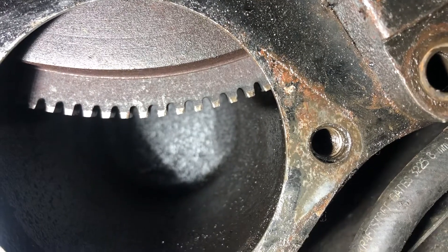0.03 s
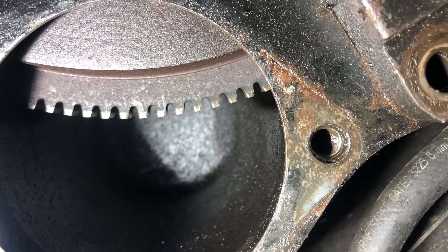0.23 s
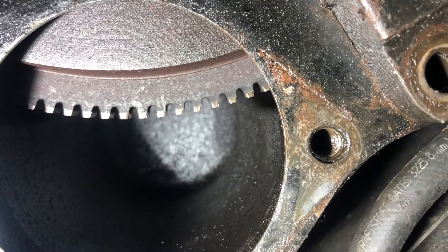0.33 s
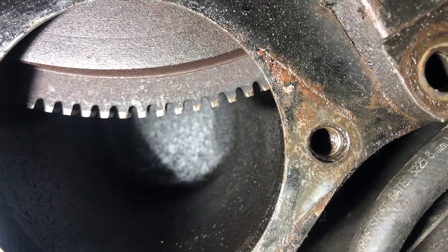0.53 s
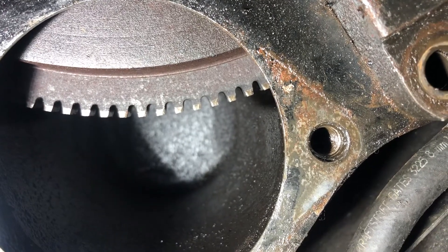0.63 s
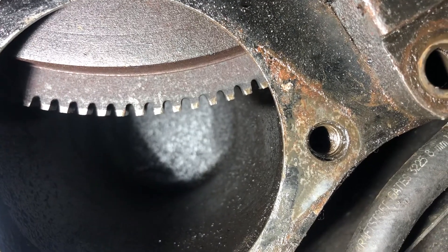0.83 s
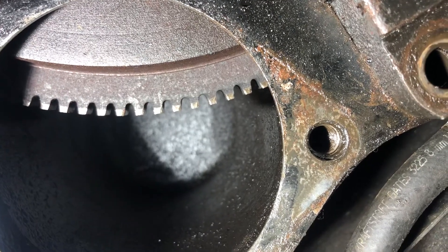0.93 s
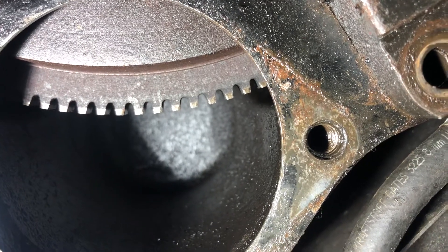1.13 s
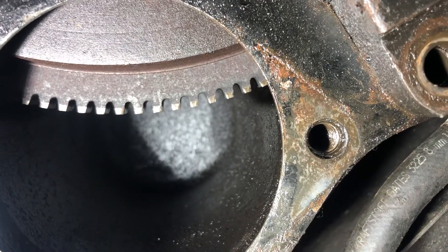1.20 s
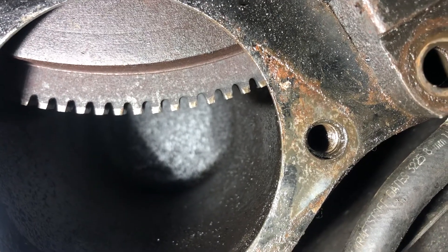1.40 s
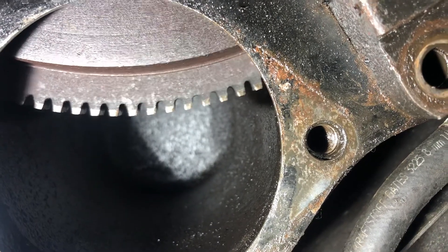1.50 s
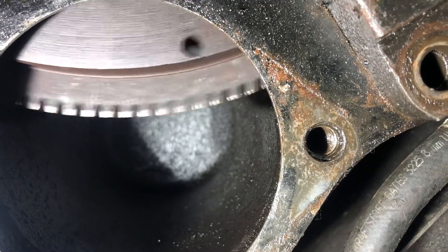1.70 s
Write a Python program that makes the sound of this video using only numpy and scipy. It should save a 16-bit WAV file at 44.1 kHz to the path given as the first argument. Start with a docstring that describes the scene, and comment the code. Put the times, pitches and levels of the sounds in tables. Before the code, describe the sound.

Six sharp ratchet clicks from a steel wheel speed up, followed by a faint hiss.

```python
"""In a small room, close by, a toothed steel wheel is turned by hand in its worn housing.
A catch scrapes up each tooth and snaps off it six times, ever faster; each impact excites the damped
modes of housing and wheel. The slack knocks softly before and after. Near the end the wheel starts
to rub, and the friction makes a swelling hiss. A low hum runs underneath."""
import sys
import numpy as np
from scipy import signal
from scipy.fft import rfft, irfft, next_fast_len
from scipy.io import wavfile
from scipy.ndimage import map_coordinates

SR = 44100
rng = np.random.default_rng(int(sys.argv[2]) if len(sys.argv) > 2 else 0)


def bounce(signal):
    """Save signal as a 16-bit WAV file at the path given by the first command-line argument."""
    frames = np.transpose(np.atleast_2d(signal))
    limited = np.clip(frames, -1, 1)
    pcm = np.round(limited * 32767).astype(np.int16)
    wavfile.write(sys.argv[1], SR, pcm)


N = 77175

# normal modes of the steel wheel: f/Hz, level/dB, t60/s
WHEEL_MODES = [(3810, -22.5, 0.036), (4304, -17, 0.073), (4480, -25, .115), (5960, -20, 0.074),
               (6900, -20.5, 0.074), (7160, -19.5, .05), (7975, -7.5, 0.061), (8040, -9.5, 0.043),
               (9250, -10, 0.063), (9337, -11, 0.067), (9620, -11, .07), (11900, -17, 0.038),
               (12320, -4, 0.053), (12700, -8, 0.057), (14450, -25.5, 0.052)]


def amp(db):
    """Amplitude ratio of a level in decibels."""
    return 10 ** (np.asarray(db) / 20)


def along(points, hz):
    """Interpolation of (f/Hz, value) points on a logarithmic frequency axis."""
    f, values = np.transpose(points)
    return np.interp(np.log(hz + 1), np.log(f + 1), values)


def since(onset):
    """Time in seconds since the onset, zero before it."""
    return np.maximum(np.arange(N) / SR - onset, 0)


def curve(points):
    """Linear interpolation of (t/s, value) points at every sample."""
    return np.interp(since(0), *np.transpose(points))


def wobble(rate):
    """Random modulation: a spline through Gaussian values, rate of them a second."""
    return map_coordinates(rng.standard_normal(4 * SR // 10), [since(0) * rate], mode="wrap")


def filtered(x, response):
    """Linear filtering: the spectrum of x times a frequency response."""
    size = next_fast_len(N + SR // 4)
    return irfft(rfft(x, size) * response(np.fft.rfftfreq(size, 1 / SR)), size)[:N]


def noise(spectrum, peaks=()):
    """Spectral shaping: noise of rms 1 with resonance peaks (f/Hz, width/Hz, gain/dB)."""
    def response(f):
        peaks_db = sum(db / (1 + (2 * (f - hz) / width) ** 2) for hz, width, db in peaks)
        return amp(along(spectrum, f) + peaks_db)
    shaped = filtered(rng.standard_normal(N), response)
    return shaped / np.sqrt(np.mean(shaped ** 2) + 1e-20)


def impact(t, attack, hold, t60):
    """Envelope of an impact: a rise, a hold while the parts chatter, then exponential decay."""
    return (1 - np.exp(-(t / attack) ** 2)) * amp(-60 * np.maximum(t - hold, 0) / t60)


def ring(modes, onset, attack):
    """Free vibration: a sum of damped sinusoids with random phase and 1 dB of level scatter."""
    out, start = np.zeros(N), int(onset * SR)
    t = np.arange(SR // 3) / SR
    for hz, db, t60 in modes:
        envelope = amp(db + rng.normal()) * impact(t, attack, 0, t60)
        out[start:start + len(t)] += envelope * np.sin(2 * np.pi * (hz * t + rng.random()))
    return out


def background():
    """Superposition: a hum wavering in level and phase, quiet room noise and three soft rumbles."""
    # partials of the hum: f/Hz, level/dB
    partials = [(96.9, -67), (145.3, -51), (220.7, -66.5), (306.8, -73.5)]
    # spectra of the room noise and the rumble: f/Hz, level/dB
    air_spectrum = [(10, -56), (25, -41.5), (45, -22), (62, -9.5), (100, -11.5), (125, -11.5), (160, -9.5),
                    (185, -16.5), (215, -8.5), (250, -16.5), (310, -11.5), (390, -27.5), (480, -20.5),
                    (760, -22.5), (900, -31), (2000, -36.5), (2600, -41.5), (7000, -51.5), (15500, -48.5)]
    rumble_spectrum = [(20, -42.5), (40, -20), (60, -9), (95, 7.5), (140, 4), (230, -8.5), (400, -38)]
    # swells of the rumble: centre t/s, half-width/s, level/dB
    swells = [(0.469, 0.056, -52), (0.995, 0.039, -57), (1.655, 0.079, -55)]
    t, hum = since(0), np.zeros(N)
    for hz, db in partials:
        amplitude = np.sqrt(2) * amp(db + 0.6 * wobble(16))
        hum += amplitude * np.sin(2 * np.pi * (hz * t + rng.random()) + 0.12 * wobble(7.6))
    swell = sum(amp(db) * np.exp(-((t - centre) / half) ** 2) for centre, half, db in swells)
    rumble = swell * noise(rumble_spectrum)
    air = amp(-58 + 2 * wobble(12)) * noise(air_spectrum, [(2100, 250, 7.6), (680, 130, 5.1)])
    return hum + rumble + air


def catch_friction():
    """Sliding friction: the catch drives the wheel's modes with noise and scrapes here and there."""
    # envelope of the sliding: t/s, level/dB
    slide_levels = [(0, -72), (.13, -71), (.16, -64), (.3, -61.5), (.36, -61.5), (.44, -56), (.5, -57),
                    (.6, -60), (.8, -56), (.88, -56.5), (.95, -72.5), (1.27, -72)]
    # spectra of sliding and scraping: f/Hz, level/dB
    slide_spectrum = [(300, 4.5), (600, 10.5), (1200, -1), (1900, -2), (2700, -3.5), (3300, -8), (4500, -8),
                      (7000, -11), (12500, -14), (14000, -25.5), (15500, -27.5)]
    scrape_spectrum = [(250, -32.5), (550, 8), (1500, -2), (2500, -10.5), (4500, -13), (8000, -25.5),
                       (12000, -31), (15000, -42)]
    # short scrapes: centre t/s, half-width/s, level/dB, peak f/Hz
    scrapes = [(.146, .004, -61, 4040), (0.357, 0.012, -55, 2320), (0.379, 0.0072, -44.5, 1050),
               (0.498, 0.013, -58, 1250), (0.8254, 0.0047, -45.5, 2180), (0.999, 0.0068, -63.5, 2200),
               (1.134, 0.013, -54, 1040), (1.176, 0.0094, -51.5, 1395), (1.243, 0.0039, -65, 2140)]
    resonances = [(hz, 150, 5) for hz, _, _ in WHEEL_MODES]
    out = amp(curve(slide_levels) + 0.86 * wobble(70)) * noise(slide_spectrum, resonances)
    for centre, half, db, hz in scrapes:
        envelope = amp(db + 1.1 * wobble(270)) * np.exp(-((since(0) - centre) / half) ** 2)
        out += envelope * noise(scrape_spectrum, [(hz, 450, 17)])
    return out


def slack_knocks():
    """Backlash: taking up the slack makes dull impacts that faintly excite the wheel's lower modes."""
    # knocks: t/s, level/dB, f/Hz, t60/s of the noisy body
    knocks = [(.068, -42.5, 710, 0.038), (.109, -45, 645, 0.059), (.821, -48, 2220, 0.029),
              (1.046, -54.5, 684, 0.061), (1.102, -52.5, 647, 0.089), (1.126, -40.5, 507, 0.13),
              (1.185, -48, 654, .08)]
    # spectrum of that body: f/Hz, level/dB
    body_spectrum = [(200, -31.5), (400, -9), (500, 0.5), (720, 1), (870, -17.5), (1050, -5.5), (1400, -18),
                     (3000, -34), (12000, -52)]
    lower_modes = [mode for mode in WHEEL_MODES if mode[0] < 7500]
    out = np.zeros(N)
    for onset, db, hz, t60 in knocks:
        envelope = impact(since(onset), attack=0.00062, hold=0.0063, t60=t60)
        body = amp(-3) * noise(body_spectrum, [(hz, 160, 6)]) * envelope
        tone = amp(2) * ring([(hz, 0, 1.5 * t60)], onset, attack=0.0011)
        tinkle = amp(-19.5) * ring(lower_modes, onset, attack=0.0016)
        out += amp(db) * (body + tone + tinkle)
    return out


def favoured(modes, centre_hz, lift_db, half_width_hz=170):
    """Selective excitation: each tooth strikes the modes near one frequency harder."""
    return [(hz, db + lift_db * np.exp(-((hz - centre_hz) / half_width_hz) ** 2), t60)
            for hz, db, t60 in modes]


def catch_clicks():
    """Impact excitation: the catch thuds on the housing, then snaps and chatters on the wheel."""
    # one click per tooth: t/s, thud level/dB, thud f/Hz, clack level/dB, sizzle level/dB,
    # sizzle peak f/Hz, chatter duration/s, favoured f/Hz, its lift/dB
    clicks = [(0.2053, -34, 760, -35.5, -28.5, 10500, 0.0052, 8010, 7.5),
              (0.382, -37.5, 1010, -35, -27.5, 8900, .004, 1001, 3.5),
              (0.5142, -34, 1017, -34.5, -24.5, 12100, 0.0081, 3185, 14),
              (.629, -32.5, 630, -35.5, -25.5, 12700, 0.0058, 4470, 7),
              (.733, -33.5, 700, -34, -24, 9500, 0.005, 5985, 7.5),
              (0.8339, -33, 1040, -35, -23.5, 9640, 0.0058, 5985, 6.5)]
    # normal modes of the housing: f/Hz, level/dB, t60/s
    housing_modes = [(497.8, -10.5, 0.12), (574, -15.5, 0.36), (675.7, -1.5, 0.07), (781, -5.5, 0.067),
                     (962, -7.5, 0.08), (1027, -9, .07), (1210, -12, 0.16), (1260, -19.5, .06),
                     (1383, -5.5, 0.11), (1549, -9.5, 0.072), (2161, -8.5, 0.047), (2786, -12, 0.055),
                     (3215, -17, 0.12)]
    # low, middle and high spectra of the dense ringing between the modes: f/Hz, level/dB
    thud_spectrum = [(200, -42.5), (390, -23), (500, -2), (700, -1.5), (860, -6.5), (1000, -2), (1500, 0.5),
                     (1850, -13.5), (3000, -25)]
    clack_spectrum = [(1000, -29), (1700, -5.5), (2400, -7), (2800, -0.5), (3370, -6.5), (3750, 2.5),
                      (4300, -1), (5500, -3), (7000, -2), (9000, -15)]
    sizzle_spectrum = [(5000, -30), (7400, -16.5), (8000, -3), (8700, -9.5), (9450, -2.5), (10300, -5),
                       (11300, -5), (12700, 0), (13300, -13), (14600, -6), (15400, -11), (16000, -29)]
    out = np.zeros(N)
    for onset, thud_db, thud_hz, clack_db, sizzle_db, bright_hz, chatter_s, mode_hz, lift_db in clicks:
        t = since(onset)
        thud = noise(thud_spectrum, [(thud_hz, 250, 7)])
        thud *= impact(t, attack=0.0012, hold=0.0048, t60=0.062)
        housing = ring(favoured(housing_modes, mode_hz, lift_db), onset, attack=0.00069)
        out += amp(thud_db) * (amp(-7) * thud + housing)
        clack = noise(clack_spectrum) * impact(t, attack=0.0016, hold=0.0056, t60=0.052)
        out += amp(clack_db - 0.5) * clack
        chatter = amp(1.4 * wobble(900)) * impact(t, attack=0.0026, hold=chatter_s, t60=0.046)
        # the hardest contact of the chatter comes 3.8 ms after the catch drops
        snap = amp(-6) * impact(since(onset + 0.0038), attack=0.0002, hold=0.00069, t60=0.008)
        sizzle = noise(sizzle_spectrum, [(bright_hz, 1500, 5)]) * (chatter + snap)
        wheel = ring(favoured(WHEEL_MODES, mode_hz, lift_db), onset, attack=0.0043)
        out += amp(sizzle_db) * (amp(-0.8) * sizzle + amp(3.5) * wheel)
    return out


def wheel_rub():
    """Friction noise coloured by resonances: the wheel rubs briefly, then with a swelling hiss."""
    # envelope of the rubbing: t/s, level/dB
    rub_levels = [(1.02, -88.5), (1.09, -73), (1.15, -68.5), (1.19, -60.5), (1.22, -75), (1.42, -85),
                  (1.55, -71), (1.6, -68), (1.66, -60), (1.71, -57.5), (1.75, -57.5)]
    # spectrum of the hiss: f/Hz, level/dB
    hiss_spectrum = [(300, -0.5), (650, 4), (1500, 1), (3000, -3.5), (6000, -2.5), (9000, -6.5),
                     (13000, -9.5), (15500, -22)]
    # resonances of the rubbing wheel: f/Hz, width/Hz, gain/dB
    resonances = [(2520, 81, 12), (3620, 100, 11.6), (3900, 118, 3.3), (4963, 205, 10), (5800, 166, 8.7),
                  (6970, 240, 15), (11500, 700, 11)]
    return amp(curve(rub_levels) + 0.47 * wobble(87)) * noise(hiss_spectrum, resonances)


def reverberation(x):
    """Convolution with a short diffuse tail whose decay rate depends on frequency."""
    # reverberation time of the room: f/Hz, t60/s
    decay_times = [(200, 0.39), (700, .33), (3000, 0.24), (9000, 0.17), (15000, 0.19)]
    build_up_s = 0.0037
    hz, t, spectra = signal.stft(rng.standard_normal(SR // 2), SR, nperseg=256)
    decay = amp(-60 * t / along(decay_times, hz)[:, None])
    tail = signal.istft(spectra * decay, SR, nperseg=256)[1]
    tail *= 1 - np.exp(-np.arange(len(tail)) / SR / build_up_s)
    return signal.fftconvolve(x, tail / np.linalg.norm(tail))[:N]


def scene():
    """Superposition of all direct sound and the reverberation of the impacts, in one channel."""
    impacts = catch_clicks() + slack_knocks()
    reflections = amp(-16) * reverberation(impacts)
    return (impacts + reflections + catch_friction() + wheel_rub() + background())[None]


def record(dry):
    """Band limiting: a steep low-pass filter removes the highest treble."""
    cutoff_hz = 15900
    return filtered(dry[0], lambda hz: 1 / (1 + (hz / cutoff_hz) ** 200))[None]


dry = scene()
out = record(dry)
bounce(out)
```